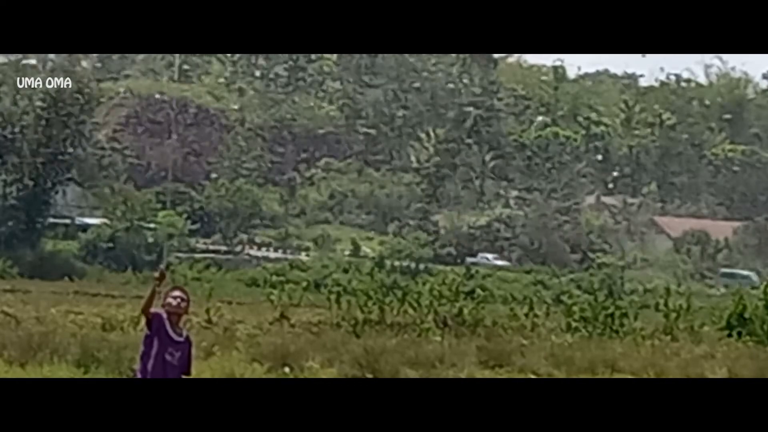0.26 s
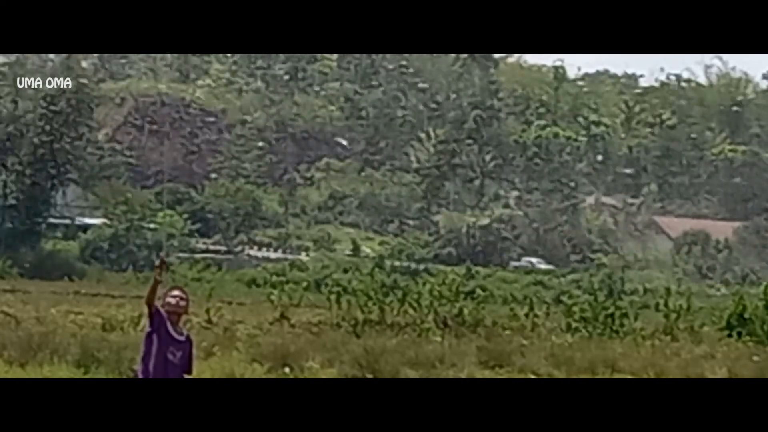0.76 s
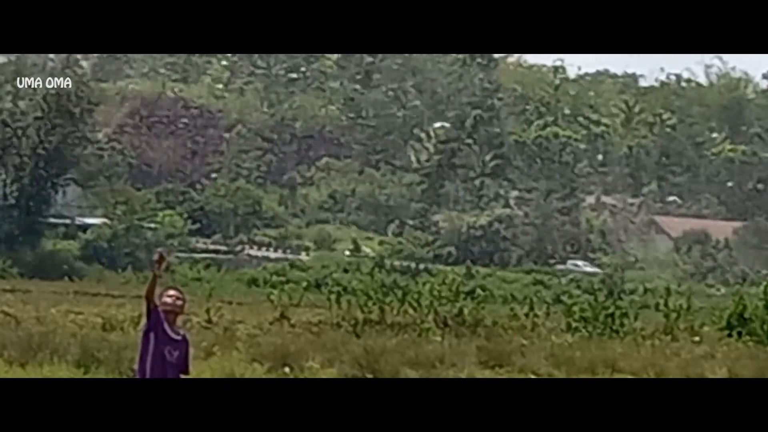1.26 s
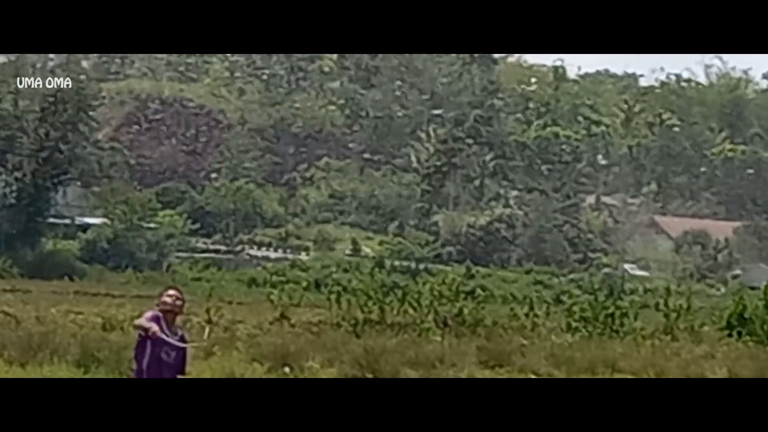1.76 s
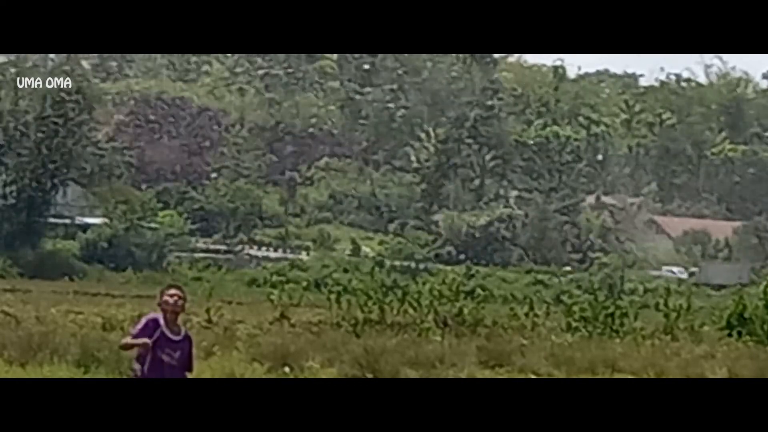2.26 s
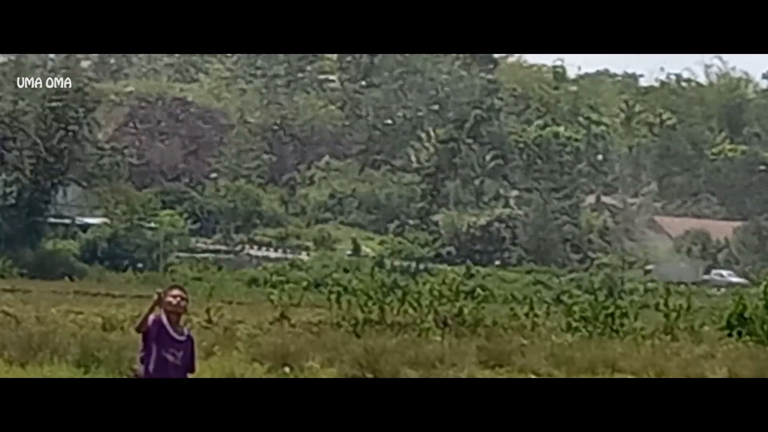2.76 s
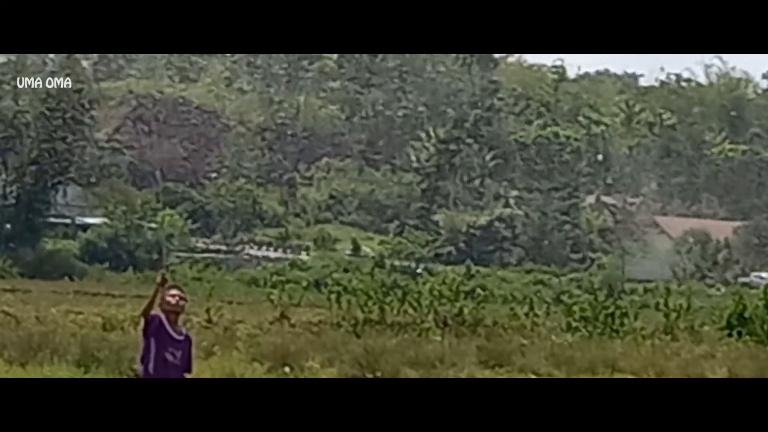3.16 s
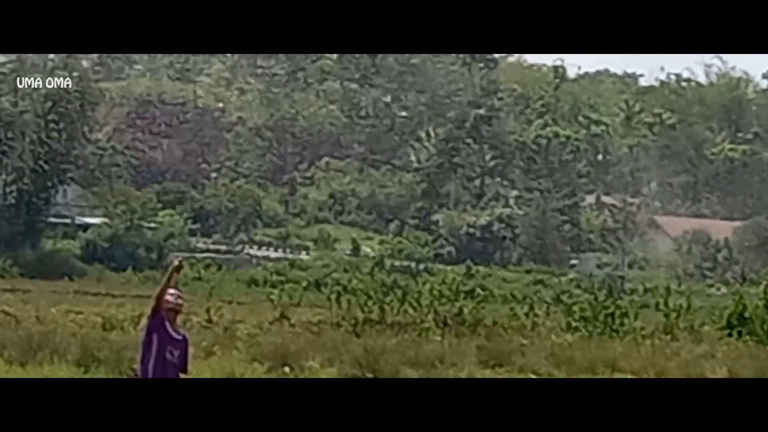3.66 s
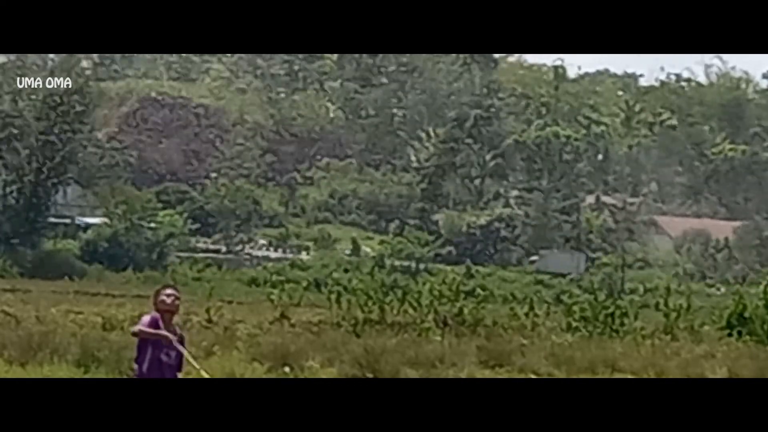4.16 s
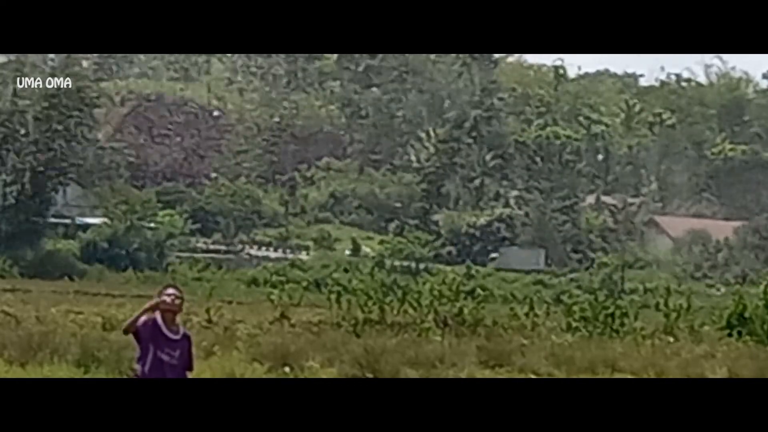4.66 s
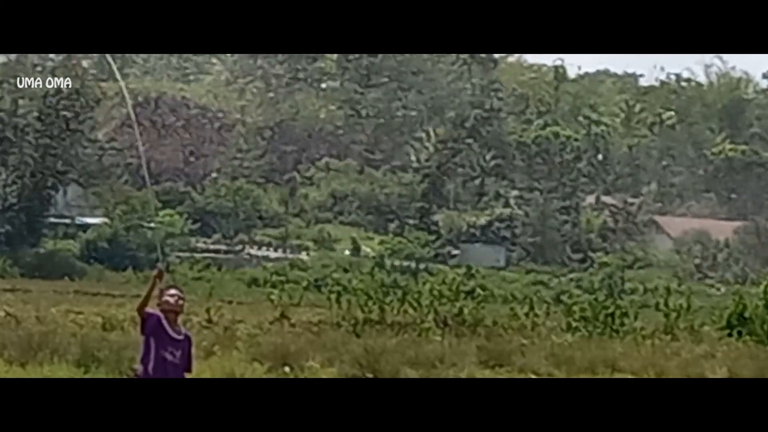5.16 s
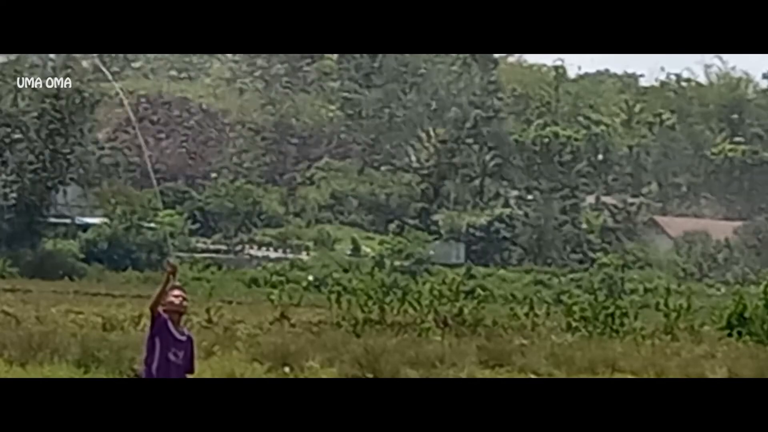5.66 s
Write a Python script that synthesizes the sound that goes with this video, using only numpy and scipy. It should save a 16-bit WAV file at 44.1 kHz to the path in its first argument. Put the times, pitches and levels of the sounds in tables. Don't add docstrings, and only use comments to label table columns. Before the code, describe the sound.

An outdoor field in stereo, with soft leaf hush and lumpy low wind bumps on the microphone. From 0 to 0.9 s thin birds chirp around 8 kHz, gusts thud at 0.4 to 0.7 s, and a slow engine thumps as its rasp and tyre hiss recede. At about 0.9 s a faint far horn near 1.1 kHz toots and sags. At 1.35 s a horse, right of centre, begins to whinny: the whistle climbs to about 2.3 kHz, then from 1.8 s shakes in some eight throbs a second, each starting clear and falling into a rough growl. Dips deepen, breath hisses and a chest rattle joins after 2.65 s; it cuts off near 3.5 s with a faint tree echo. The engine revs slightly around 4.3 s, when a tiny knock sounds. Insects tick in short bouts from 3.9 s, strongest at 5.7 s, while gusts thump near 4.9, 5.3 and 5.8 s.

```python
import sys
import numpy as np
from scipy import signal
from scipy.fft import rfft, irfft, next_fast_len
from scipy.io import wavfile
from scipy.ndimage import map_coordinates

SR = 44100
rng = np.random.default_rng(int(sys.argv[2]) if len(sys.argv) > 2 else 0)


def boost(x):
    u = np.asarray(x, float) / 20
    return 10 ** u


def master_out(mix):
    frames = np.transpose(np.atleast_2d(mix))
    ceiling = np.clip(frames, -1, 1)
    pcm = np.round(ceiling * 32767).astype(np.int16)
    wavfile.write(sys.argv[1], SR, pcm)


N = 261072

# peak time in seconds, half length in seconds, peak in dB, left-right in dB.
GUSTS = [(0.362, 0.14, -44.5, 4), (0.608, 0.035, -41, 8), (0.707, 0.041, -41, 20), (1.01, 0.14, -60, -5),
         (1.294, 0.23, -53, 0), (1.5, .12, -53, 4), (1.919, 0.097, -43, -0.5), (2.211, 0.039, -46.5, 1),
         (2.46, 0.099, -44, 8), (3.079, 0.04, -43, 19.5), (3.19, 0.052, -48, -0.5), (4.322, .2, -50, 0.5),
         (4.625, .12, -51, -7.5), (4.926, 0.092, -40, -0.5), (5.29, 0.098, -39.5, -3.5),
         (5.547, 0.11, -52.5, -3), (5.843, 0.048, -39, 2.5)]
# frequency in Hz, level in dB.
BUFFET_COLOUR = [(22, -61), (38, -16), (60, -6), (90, -9.5), (180, -25.5), (400, -58.5), (900, -78.5)]
# frequency in Hz, level in dB per Hz.
LEAF_COLOUR = [(88, -17), (150, -7.5), (221, -35.5), (296, -19.5), (541, -30), (710, -27), (1180, -36),
               (2190, -37.5), (7020, -53.5), (8530, -48.5), (11600, -55), (12600, -74), (15600, -64)]
# start in seconds, length in seconds, peak in dB.
TICK_BOUTS = [
    (3.9167, .1, -69),
    (4.167, .06, -74),
    (4.5728, .185, -72),
    (4.8207, .06, -71.5),
    (5.024, .1, -71),
    (5.186, .06, -71),
    (5.3433, .1, -69),
    (5.5038, .185, -67),
    (5.7106, .205, -60.5),
]
# start in seconds, length in seconds, first pitch in Hz, last pitch in Hz, level in dB.
BIRD_NOTES = [
    (0.062, 0.12, 7860, 8370, -65),
    (0.166, 0.11, 8200, 7500, -68),
    (0.432, 0.067, 8100, 8250, -64),
    (0.47, 0.079, 7050, 8240, -69),
    (0.748, 0.19, 7640, 7830, -69.5),
    (0.827, 0.083, 7700, 8250, -67),
    (.85, 0.038, 7750, 7700, -79),
    (4.921, 0.039, 5300, 5450, -80.5),
]
# time in seconds, peak in dB.
KNOCK = [
    (4.2601, -66),
]
# time in seconds, cycle rate in Hz, thump level in dB.
ENGINE_SPEED = [
    (0, 17, -62),
    (.1, 18.6, -61),
    (.6, 18.2, -58),
    (1, 19.3, -57.5),
    (1.2, 17.8, -55.5),
    (2.5, 17.37, -48),
    (3.6, 20.7, -52.5),
    (4.3, 22.9, -53),
    (5, 18.2, -51),
    (5.92, 19.1, -52),
]
# frequency in Hz, level in dB.
PIPE = [(28, -39.5), (55, -6), (80, -4), (115, 2), (160, -7), (230, -14), (350, -22.5), (600, -38.5),
        (1200, -95)]
# frequency in Hz, level in dB per Hz.
RASP_COLOUR = [(180, -27.5), (300, -15.5), (378, -11), (398, -21.5), (730, -6), (1160, -17.5),
               (1400, -38.5), (1820, -62), (3080, -120)]
# frequency in Hz, level in dB per Hz.
TYRE_COLOUR = [(760, -73), (1300, -24.5), (1370, -21.5), (1740, -2), (1920, -10), (2250, 0), (2470, -8.5),
               (4430, -18), (4890, -27.5), (7000, -16), (9100, -40), (15400, -120)]
# frequency in Hz, time to decay by 60 dB in seconds.
TREE_DECAY = [(300, 0.37), (2000, 1.44), (5000, 1.12), (12000, 0.12)]
# frequency in Hz, left-right difference in dB.
PORT_SHADOW = [(60, 0.5), (110, -6), (200, -10.5), (380, 5.5), (700, -4), (1290, 2), (2380, -2.5),
               (4400, -4), (8120, -8), (15000, -2.5)]
# time in seconds, whistle in Hz, whistle in dB, growl in dB, roughness 0-1.
CALL_ONSET = [
    (1.325, 1557, -90, -102, 0.23),
    (1.343, 1707, -50.5, -59.5, 0.08),
    (1.385, 2045, -42, -55, 0.08),
    (1.42, 2261, -49.5, -53, 0.3),
    (1.481, 2259, -44, -50.5, 0.1),
    (1.51, 2337, -37, -48, 0.3),
    (1.646, 2340, -33.5, -41, 0.04),
    (1.709, 2254, -39, -41.5, 0.31),
    (1.76, 2215, -38.5, -37, 0.25),
]
# crest time in seconds, crest pitch in Hz, pitch of the dip after it in Hz,
# whistle at the crest in dB, growl in the dip in dB.
BELLY_THROBS = [(1.821, 2372, 2232, -37, -53.5), (1.923, 2390, 2162, -37, -40),
                (2.043, 2340, 2056, -36.5, -34.5), (2.16, 2299, 2070, -34, -30.5),
                (2.279, 2338, 2029, -32.5, -31.5), (2.405, 2295, 1933, -33, -32.5),
                (2.527, 2280, 1765, -32.5, -30.5), (2.658, 2260, 1705, -33.5, -31),
                (2.79, 2113, 1600, -34, -34), (2.91, 2038, 1552, -35, -33.5), (3.043, 1940, 1596, -34, -33),
                (3.173, 2136, 1637, -34, -32.5), (3.3, 2189, 1660, -34, -37), (3.426, 2111, 1669, -35, -40)]
OVERTONES = [9.5, 4.5, -1, -2, 14.5, 12]
# frequency in Hz, level in dB.
THROAT = [(150, -62), (650, -26), (1150, -23.5), (1600, -8), (1950, -3.5), (2350, -8.5), (2800, 0.5),
          (3200, -11), (3700, -11), (4250, -5.5), (4600, -13), (4950, -7), (5900, -21), (10000, -34)]
# frequency in Hz, level in dB.
NOSTRILS = [(4500, -38.5), (6000, -5), (6900, -32), (7650, -5.5), (8250, -10), (8900, -16.5), (10500, -19),
            (11700, -11.5), (12600, -6.5), (14000, -15.5), (14700, -38.5), (15500, -57.5)]
# time in seconds, hiss in dB, brightness in dB.
BREATH_FLOW = [
    (1.33, -94.5, -15),
    (1.35, -64, -2),
    (1.47, -59.5, 6),
    (1.609, -47.5, 0.5),
    (1.751, -50.5, -7.5),
    (1.882, -67, -6.5),
    (2.24, -48, -11.5),
    (2.76, -46, -7),
    (3.481, -46, -15.5),
]
# frequency in Hz, level in dB.
CHEST = [(250, -33), (400, -10.5), (700, -1.5), (1000, 8.5), (1300, -43)]
# centre in Hz, width in
# Hz, depth 0-1.
POCKETS = [(1230, 420, .95), (3350, 130, .93), (6100, 300, .7), (6800, 300, .8), (10500, 700, .9),
           (15600, 1500, .8)]
FIELD_LAG_S = 19.04 / 44100


def unit(x):
    return x / np.sqrt(np.mean(x ** 2) + 1e-20)


def along(points, hz):
    f, v = np.transpose(points)
    return np.interp(np.log(hz + 1), np.log(f + 1), v)


def curves(rows):
    s, *cols = np.transpose(rows)
    return [np.interp(np.arange(N) / SR, s, c) for c in cols]


def wobble(rate):
    knots = rng.standard_normal(int(N * rate / SR) + 4)
    return unit(map_coordinates(knots, [np.arange(N) * rate / SR]))


def filtered(x, response):
    m = next_fast_len(N + SR // 2)
    padded = np.pad(x, (0, m - N), "linear_ramp", end_values=x[0])
    return irfft(rfft(padded) * response(np.fft.rfftfreq(m, 1 / SR)), m)[..., :N]


def causal(points):
    def response(hz):
        cepstrum = irfft(np.log(boost(along(points, hz))))
        half = len(cepstrum) // 2
        cepstrum[1:half] *= 2
        cepstrum[half + 1:] = 0
        return np.exp(rfft(cepstrum))
    return response


def noise(points):
    return unit(filtered(rng.standard_normal(N), lambda hz: boost(along(points, hz))))


def ports(x, lag, balance):
    def both(hz):
        half = boost(along(balance, hz) / 2) * np.exp(-1j * np.pi * hz * lag)
        return np.array([half, 1 / half])
    return filtered(x, both)


def pulses(cycles, sizes):
    at = np.flatnonzero(np.diff(np.floor(cycles)) > 0)
    return np.bincount(at, sizes[at], N)


def clicks(rows, points, t60):
    hits = np.bincount([round(s * SR) for s, db in rows], [boost(db) for s, db in rows], N)
    decay = boost(-60 * np.arange(SR // 20) / SR / t60)
    return noise(points) * signal.fftconvolve(hits, decay)[:N]


def wind():
    t, side = np.arange(N) / SR, np.array([[1], [-1]])
    gusts = boost(-55)
    for s, half, db, pan_db in GUSTS:
        gusts = gusts + boost(db + side * pan_db / 2 - 14 * ((t - s) / half) ** 2)
    shared = noise(BUFFET_COLOUR)
    lumps = np.array([unit(shared + 0.5 * noise(BUFFET_COLOUR)) for port in side])
    hush = np.array([noise(LEAF_COLOUR), noise(LEAF_COLOUR)]) * boost(0.27 * wobble(2.2))
    return gusts * boost(-4 + 1.3 * wobble(8.9)) * lumps + boost(-63) * hush


def engine():
    nearest_s, distance_m, speed_m_per_s = 0.39, 8.3, 23
    cycle_hz, thump_db = curves(ENGINE_SPEED)
    since = np.arange(N) / SR - nearest_s
    away_db = -20 * np.log10(np.hypot(1, speed_m_per_s * since / distance_m))
    rasp_db = -63 + away_db
    tyres_db = -67 + 1.8 * away_db - 4.25 * since
    firings = 2 * np.cumsum(cycle_hz * (1 + 0.00753 * wobble(6))) / SR + 0.3974
    size_db = np.where(np.floor(firings + 1) % 2, 0, -11) + 1.3 * wobble(30)
    blasts = unit(filtered(pulses(firings, boost(size_db)), causal(PIPE)))
    thump = unit(blasts + 0.88 * noise(PIPE))
    rasp = unit(noise(RASP_COLOUR) * np.exp(0.75 * np.cos(2 * np.pi * (firings - 0.15))))
    tyres = noise(TYRE_COLOUR) * boost(2 * wobble(21))
    bass = ports(boost(thump_db + 3.5) * thump, lag=FIELD_LAG_S, balance=[(100, -1.55)])
    road = boost(rasp_db) * rasp + boost(tyres_db) * tyres
    return bass + ports(road, lag=0.00038, balance=[(1000, -0.64)])


def insects():
    chorus = noise([(6500, -70), (7700, -13), (8300, 9.5), (8900, -3.5), (10500, -48)])
    chorus = chorus * boost(-80.5 + 0.72 * wobble(30))
    rows = []
    for s, length, db in TICK_BOUTS:
        for at in np.arange(s, s + length, 0.0409):
            rows.append((at, db + 1.5 * rng.standard_normal()))
    ticks = clicks(rows, [(2500, -40), (5000, -2), (8500, 9), (11500, 9), (16000, -13)], t60=0.0084)
    return chorus * boost([[-11], [0]]) + ports(ticks, lag=0.00021, balance=[(8000, -7)])


def birds():
    out = np.zeros(N)
    for s, length, from_hz, to_hz, db in BIRD_NOTES:
        count = round(length * SR)
        glide = np.cumsum(np.linspace(from_hz, to_hz, count)) / SR
        out[round(s * SR):][:count] += boost(db) * np.hanning(count) * np.sin(2 * np.pi * glide)
    return out


def horn():
    start_s, attack_s, hold_s = 0.89, 0.08, 0.078
    t = np.arange(N) / SR - start_s
    after = np.maximum(t - attack_s - hold_s, 0)
    hz = 1105 - 90.1 * (1 - np.exp(-after / 0.07))
    db = -60.5 - 4 * np.minimum(after / 0.02, 1) - 62 * after
    swell = np.clip(t / attack_s, 0, 1) * boost(db + 1.7 * wobble(25))
    return swell * np.sin(2 * np.pi * np.cumsum(hz * (1 + 0.01 * wobble(30))) / SR)


def trees(x, spread):
    hz, t, z = signal.stft(rng.standard_normal((3, SR)), SR, nperseg=256)
    decay = boost(-60 * t / along(TREE_DECAY, hz)[:, None])
    tail = signal.istft(z * decay, SR, nperseg=256)[1]
    delayed = np.pad(x, (800, 0))[None]
    echo = signal.fftconvolve(delayed, tail / np.linalg.norm(tail[0]), axes=1)[:, :N]
    return ports(echo[0], FIELD_LAG_S, PORT_SHADOW) + spread * echo[1:]


def grass(x, t60):
    tail = rng.standard_normal((2, SR // 20)) * boost(-60 * np.arange(SR // 20) / SR / t60)
    return signal.fftconvolve(x[None], tail / np.linalg.norm(tail[0]), axes=1)[:, :N]


def throbs(bend, rise, fall):
    s, crest_hz, dip_hz, crest_db, dip_growl_db = np.transpose(BELLY_THROBS)

    def slack_khz(hz):
        return np.maximum(2280 - hz, 0) / 1000

    onset = [(at, hz, 0.212 * hz, *rest) for at, hz, *rest in CALL_ONSET]
    growl_over_db = np.minimum(-5 + 35 * slack_khz(crest_hz), 2.9)
    crests = np.transpose([s, crest_hz, 0.218 * crest_hz, crest_db, crest_db + growl_over_db, 0.08 + 0 * s])
    dip_s = s + 0.505 * np.append(np.diff(s), 0.118)
    dip_db = crest_db + 1.5 - 18 * slack_khz(dip_hz)
    dip_rough = 0.22 + 0.85 * slack_khz(dip_hz)
    dips = np.transpose([dip_s, dip_hz, 0.208 * dip_hz, dip_db, dip_growl_db, dip_rough])
    rows = [[*row, 0.06] for row in onset]
    for start, crest, dip in zip([np.array(onset[-1]), *dips], crests, dips):
        climb = (start, rise, -1, (0.85, 0.7, 0.5, 0.21))
        drop = (dip, fall, 1, (0, 0.25, 0.5, 0.75, 1))
        for far, fade, side, steps in (climb, drop):
            for u in steps:
                share = np.array([u, u ** bend, u ** bend, u ** fade, u ** fade, u ** fade])
                grip = ((1 + side * u) / 2) ** 1.45 * np.sqrt(dip[5])
                rows.append([*(crest + share * (far - crest)), grip])
    past_end = np.maximum(np.arange(N) / SR - dips[-1, 0], 0)
    gone_db = 57 * (past_end / 0.045) ** 1.4
    return *curves(rows), np.minimum(gone_db, 150)


def whistle(turn, folds, whistle_db, hiss_db, bright_db, rough, grip):
    depth = 0.07996 + 1.5 * np.tanh(2 * grip) ** 2
    shake = depth * np.exp(2j * np.pi * folds) + 0.2j * wobble(400)
    total = 0
    for k, db in enumerate(OVERTONES, 1):
        lift_db = (k > 1) * (1.8 * wobble(60) - 9 * grip)
        lift_db = lift_db + (k == 2) * 0.74 * np.maximum(whistle_db + 37.5, 0)
        lift_db = lift_db + (k > 2) * (0.6 * (hiss_db + 47.5) - 30 * rough)
        lift_db = lift_db + (k > 4) * 2 * bright_db
        total = total + boost(db + lift_db) * np.exp(1j * k * turn + (k > 1) * shake)
    return total


def fold_gate(folds, grip, late, swing):
    half_rate = np.tanh(2 * grip) + 0.25 * late
    pull = 0.55j * (np.sin(2 * np.pi * folds) + half_rate * np.sin(np.pi * folds))
    depth = 0.08 + 0.95 * np.tanh(2 * grip) ** 1.5
    return unit(np.exp(depth * (0.7 * swing + pull - 0.3)))


def growl(folds, growl_db, rough, puffs):
    stronger = np.where(np.floor(folds + 1) % 2, 1, -1)
    claps = pulses(folds, boost(rough * (2.8 * stronger + 5 * np.tanh(wobble(300)))))
    claps = unit(filtered(claps, causal(THROAT)))
    return boost(growl_db) * (0.45 * claps + 0.8 * noise(THROAT) * puffs)


def breath(hiss_db, bright_db, growl_db, rough, puffs):
    low = noise([p for p in NOSTRILS if p[0] < 11000] + [(11500, -54.5)])
    high = noise([(9500, -68.5)] + [p for p in NOSTRILS if p[0] > 10000])
    level_db = hiss_db + 2.5 + 1.9 * wobble(24.45) - 3.22 * rough
    level_db = level_db + np.minimum(growl_db + 50.5, 0) * 0.5
    return boost(level_db) * puffs * (low + boost(bright_db + 2.34 * wobble(25)) * high)


def pockets(hz):
    return np.prod([1 - d * 1j * hz * w / (c * c - hz * hz + 1j * hz * w) for c, w, d in POCKETS], axis=0)


def horse():
    whistle_hz, fold_hz, whistle_db, growl_db, rough, grip, gone_db = throbs(bend=1.55, rise=3.5, fall=1.6)
    rough = np.clip(rough, 0, 1)
    hiss_db, bright_db = curves([(1.32, -110, 0)] + BREATH_FLOW)
    hiss_db = hiss_db + 3 * grip
    folds = np.cumsum(fold_hz * (1 + (0.023 + 0.27 * rough ** 2) * wobble(250))) / SR
    jitter = 0.0042 * wobble(200) + 0.036 * rough ** 2 * wobble(300)
    turn = 2 * np.pi * np.cumsum(whistle_hz * (1 + jitter)) / SR
    late = np.clip((np.arange(N) / SR - 2.65) / 0.17, 0, 1)
    swing = np.cos(2 * np.pi * folds) + (0.88 * grip + 0.25 * late) * np.cos(np.pi * folds)
    puffs = unit(np.exp(0.52 * swing))
    tone = whistle(turn, folds, whistle_db, hiss_db, bright_db, rough, grip)
    tone_db = whistle_db + 6 * np.minimum(grip - 0.3, 0.12) - 0.28 + 5 * rough * wobble(150)
    chopped = boost(tone_db) * np.real(tone * fold_gate(folds, grip, late, swing))
    voice = filtered(chopped, causal([(hz, 0.54 * db) for hz, db in THROAT]))
    voice = voice + growl(folds, growl_db, rough, puffs)
    voice = voice + breath(hiss_db, bright_db, growl_db, rough, puffs)
    rattle = boost(-58.5) * late * (0.84 + grip) * puffs * noise(CHEST)
    return filtered(boost(-gone_db) * (voice + rattle), pockets)


def scene():
    call, toot = horse(), horn()
    knock = boost(1) * clicks(KNOCK, [(1500, -38), (3500, 5), (7000, -39)], t60=0.05)
    direct = ports(call + birds() + knock, FIELD_LAG_S, PORT_SHADOW) + toot
    direct += boost(-17) * grass(call, t60=0.025)
    answer = trees(boost(-31) * call + boost(-7.5) * toot, spread=0.98)
    return direct + answer + engine() + wind() + insects()


def low_pass(x):
    return signal.sosfilt(signal.butter(12, 15730, fs=SR, output="sos"), x)


def record(dry):
    return low_pass(dry)


dry = scene()
out = record(dry)
master_out(out)
```